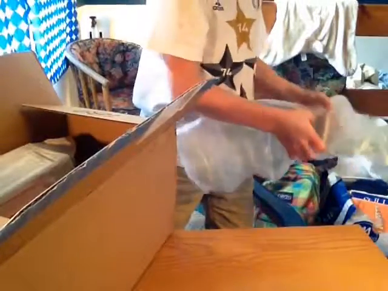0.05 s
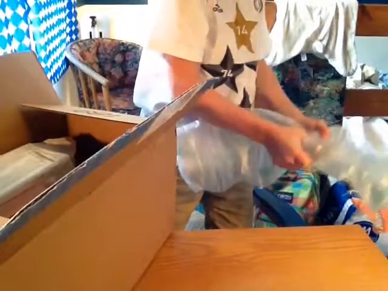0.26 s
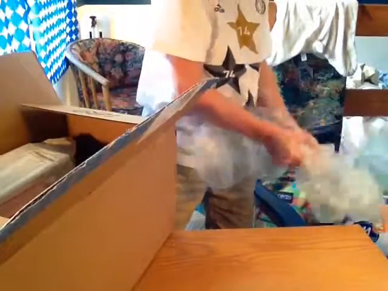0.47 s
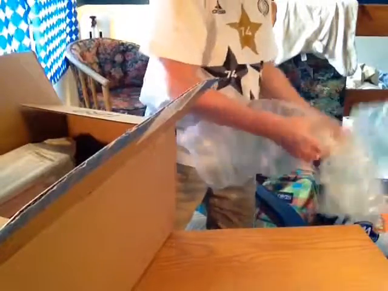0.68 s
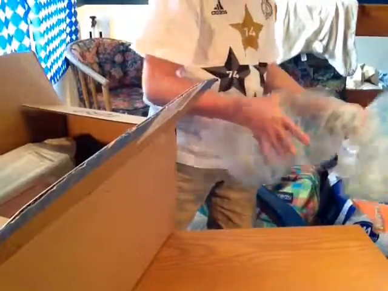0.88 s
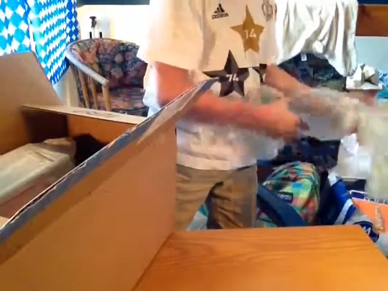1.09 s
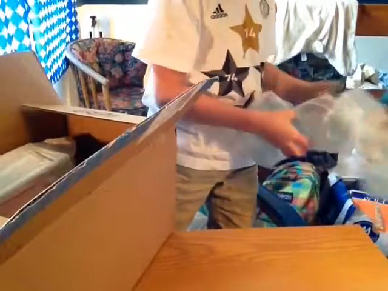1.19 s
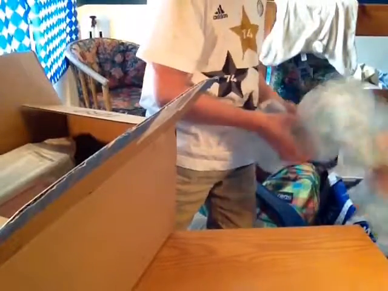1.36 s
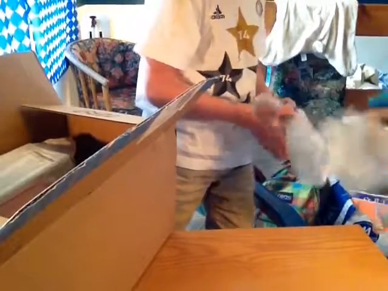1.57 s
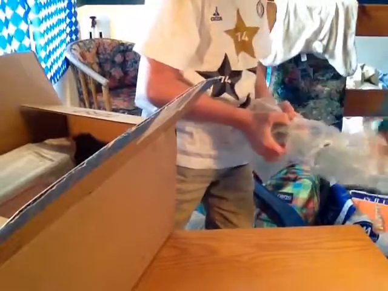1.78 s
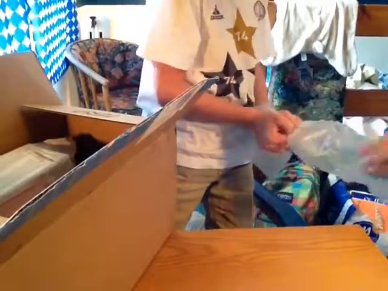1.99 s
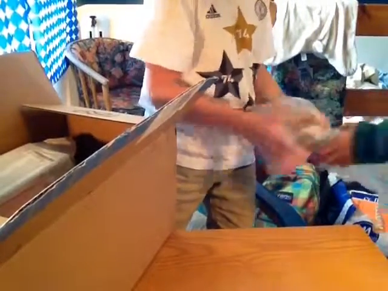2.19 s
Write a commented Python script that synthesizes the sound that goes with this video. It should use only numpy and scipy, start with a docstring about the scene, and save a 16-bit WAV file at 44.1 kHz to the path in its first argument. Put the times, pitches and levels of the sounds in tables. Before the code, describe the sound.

Bubble packaging popped by hand, three loud bursts amid crinkling plastic film in a furnished room

```python
"""Film rustles throughout, with creaks scattered through it and crowded around 1.5 to 1.7 s: hands wring
plastic bubble packaging in a furnished room, a couple of metres from a phone. Three big air pockets burst, each
a thump with a tearing crack, and a small one with only a faint thump; they ring the room. Rustle is filtered
noise with random grains; creaks are short decaying sines with ticks of noise; thumps are filtered impulses,
cracks decaying noise. The microphone overloads on the loud bursts."""
import sys
import numpy as np
from scipy import signal
from scipy.fft import rfft, irfft, next_fast_len
from scipy.io import wavfile
from scipy.ndimage import uniform_filter1d

SR = 44100
rng = np.random.default_rng(int(sys.argv[2]) if len(sys.argv) > 2 else 0)


def int16_out(signal):
    """Quantize to a 16-bit WAV file."""
    q = np.round(np.clip(np.atleast_2d(signal).T, -1, 1) * 32767)
    wavfile.write(sys.argv[1], SR, q.astype(np.int16))


def to_linear_factor(level_db):
    """Convert decibel levels (scalar or array-like) to linear amplitude factors."""
    exponent = np.asarray(level_db, float) / 20
    return 10 ** exponent


N = 99225

M = next_fast_len(N + SR)  # transform length [samples], with space for the room to die away
F = np.maximum(np.arange(M // 2 + 1) * SR / M, 1.)  # frequency of each bin [Hz]


def unit(x):
    """Scale to rms 1."""
    return x / np.sqrt(np.mean(x ** 2))


def shape(table):
    """Gain in dB per frequency bin from (Hz, dB) points, -90 dB outside them."""
    hz, db = np.array(table, float).T
    return np.interp(np.log(F), np.log(hz), db, left=-90, right=-90)


def causal(db):
    """Minimum-phase response with the given gains: nothing sounds ahead of its cause."""
    cepstrum = irfft(np.log(to_linear_factor(db)), M)
    cepstrum[1:M // 2] *= 2
    cepstrum[M // 2 + 1:] = 0
    return np.exp(rfft(cepstrum))


def delay(seconds):
    """Phase turn per frequency bin that makes a sound arrive later."""
    return np.exp(-2j * np.pi * F * seconds)


def highpass(x, order, hz):
    """Butterworth filter that weakens what lies below hz."""
    return signal.sosfilt(signal.butter(order, hz, "high", fs=SR, output="sos"), x)


def room():
    """Transfer of the reflections from one spot: noise that fills in quickly and dies band by band."""
    # late decay of the furnished room: (frequency [Hz], time to fall 60 dB [s])
    decay = [(100, 0.13), (250, 0.4), (550, .4), (1100, 0.57), (1800, 0.38), (4000, 0.33), (10000, 0.34),
             (15000, 0.2)]
    room_db, fill_s = 10.5, 0.00076
    early_db, early_t60_s = 7.5, 0.052  # extra early reflections, on top of the late decay
    mode_hz, mode_db, mode_t60_s = 109, -19, 0.42  # level before the room is scaled
    even_fine_hz, even_broad_hz = 90, 900
    t = np.arange(SR) / SR
    noise = rfft(rng.standard_normal(SR), M)
    hz, t60 = np.array(decay).T
    tail = 0
    for k in range(len(hz)):
        share = np.interp(np.log(F), np.log(hz), np.arange(len(hz)) == k)
        tail = tail + irfft(noise * share, M)[:SR] * to_linear_factor(-60 * t / t60[k])
    early = to_linear_factor(early_db - 60 * t / early_t60_s)
    tail = tail * (1 - np.exp(-t / fill_s)) * (1 + early)
    mode = to_linear_factor(mode_db - 60 * t / mode_t60_s) * np.sin(2 * np.pi * mode_hz * t)
    spec = rfft(tail, M)

    def mean_power(width_hz):
        return uniform_filter1d(np.abs(spec) ** 2, int(width_hz * M / SR))

    # diffuse: no narrow band of the tail stands out
    evening_db = 10 * np.log10(mean_power(even_broad_hz) / mean_power(even_fine_hz))
    spec = spec * causal(evening_db)
    return to_linear_factor(room_db) * (spec + rfft(mode, M)) / np.sqrt(np.sum(tail ** 2))


def heard(spec, wet_db):
    """Direct sound, its echo off the table top and the room."""
    table_echo = to_linear_factor(-4.5) * delay(0.000913)
    return irfft(spec * (1 + table_echo + to_linear_factor(wet_db) * room()), M)[:N]


def rustle():
    """Dense tiny crinkles of uneven size over noise, in three ranges, each flickering a little."""
    # rustle of the film: (time [s], treble level [dB], middle level [dB], bass level [dB])
    levels = [(0.0,-42,-47,-52.5), (0.12,-41,-47,-62), (0.19,-40.5,-44,-55), (0.31,-50.5,-68,-61),
              (0.43,-51,-46,-56), (0.56,-52,-44,-53), (0.641,-48.5,-47.5,-52), (0.75,-38.5,-47,-54),
              (0.86,-43,-50.5,-56.5), (0.931,-37,-45,-54), (.98,-38.5,-45.5,-56), (1.03,-32,-39.5,-43.5),
              (1.1,-36,-42.5,-49), (1.14,-32,-39.5,-44), (1.2,-37.5,-43,-51), (1.27,-32,-40,-46.5),
              (1.33,-38,-42,-46), (1.42,-28,-38,-48), (1.47,-32.5,-30.5,-33.5), (1.52,-26,-28.5,-27),
              (1.6,-29.5,-29.5,-47), (1.66,-31,-35,-43), (1.71,-27,-31.5,-50.5), (1.78,-34,-45,-46),
              (1.85,-28,-35.5,-46), (1.91,-30.5,-40,-46.5), (2.03,-63,-36.5,-59), (2.1,-46.5,-44,-45),
              (2.18,-37.5,-41,-44), (2.25,-42.5,-47.5,-60)]
    # colour of the treble: (frequency [Hz], gain [dB])
    treble = [(2940, -2), (5000, -2), (8140, -2.5), (12400, -1.5), (15500, -7.5)]
    # colour of the middle: (frequency [Hz], gain [dB])
    middle = [(710, 3), (1200, 6), (1780, 2.5), (2090, 7), (5500, -4.5), (7150, -25), (12100, -120)]
    # colour of the bass: (frequency [Hz], gain [dB])
    bass = [(53, -73), (80, -53), (120, 0), (170, -7), (311, 6), (430, -3), (760, 0.5), (1300, -16),
            (1700, -29)]
    grains_per_s, grain_spread_db = 3500, 3.5
    flicker_db, flicker_per_s = 1.5, 30  # depth before smoothing
    wet_db = -18
    t, rows = np.arange(N) / SR, np.array(levels)
    hold = int(SR / flicker_per_s)
    out = 0
    for column, colour in enumerate((treble, middle, bass), start=1):
        is_grain = rng.random(N) < grains_per_s / SR
        size = to_linear_factor(grain_spread_db * rng.exponential(size=N))
        grains = rng.standard_normal(N) * (0.86 + is_grain * size)  # 0.86: the noise beneath
        steps = np.repeat(rng.standard_normal(N // 200), hold)[:N]
        flicker = uniform_filter1d(steps, hold)
        band = unit(irfft(rfft(grains, M) * causal(shape(colour)), M)[:N])
        level_db = np.interp(t, rows[:, 0], rows[:, column])
        out = out + band * to_linear_factor(level_db + flicker_db * flicker)
    return irfft(rfft(out, M) * (1 + to_linear_factor(wet_db) * room()), M)[:N]


def creaks():
    """Each slip ticks, rings briefly at its pitch and shakes the bundle, more so the lower it is."""
    # slips of stretched film: (time [s], level [dB], pitch [Hz])
    slips = [(.105, -30, 1150), (.133, -26, 6500), (.174, -15.5, 5000), (.373, -25, 3800),
             (.997, -26, 6000), (1.4718, -15, 1300), (1.4862, -8, 2000), (1.495, -8, 900),
             (1.515, -6, 1800), (1.5225, -11, 3300), (1.530, -14, 1300), (1.534, -11, 3400),
             (1.538, -16, 3600), (1.5455, -9, 2000), (1.5485, -9, 1200), (1.610, -17, 2500),
             (1.625, -18, 2200), (1.671, -15, 3800), (1.6768, -5, 4000), (1.683, -5, 3900),
             (1.6892, -4.5, 4200), (1.702, -4, 4400), (1.709, -4, 4400), (1.716, -12, 3700),
             (1.720, -13, 3200), (1.729, -17, 4300)]
    creak_t60_s, tick_db, wet_db = .003, -6, -11
    bundle_hz, bundle_t60_s, bundle_db = 333, .016, -7.5  # bundle level for a slip at 1000 Hz
    film_low_hz = 215
    out, t = np.zeros(N + SR), np.arange(SR // 50) / SR
    noise = rng.standard_normal((len(slips), len(t)))

    def ring(hz, t60):
        return np.sin(2 * np.pi * hz * t) * to_linear_factor(-60 * t / t60)

    for (start_s, db, hz), hiss in zip(slips, noise):
        lowness = 1000 / hz
        tick = to_linear_factor(tick_db) * min(lowness, .5) * hiss * np.exp(-t / 0.001)
        slip = highpass(ring(hz, creak_t60_s) + tick, 2, hz / 2.85)
        slip = slip + to_linear_factor(bundle_db) * lowness ** 2 * ring(bundle_hz, bundle_t60_s)
        first = int(start_s * SR)
        out[first:first + len(t)] += to_linear_factor(db) * slip
    thin = highpass(out[:N], 2, film_low_hz)
    return heard(rfft(thin, M), wet_db)


def pops():
    """Escaping air thumps at the pitch of the pocket; the film tears with a crack, lost in the small one."""
    # moments at which the pockets burst: (time [s])
    burst_s = [0.2022, 0.326, 0.4494, 1.9243]
    # the bursts: (thump level [dB], pocket pitch [Hz], tilt [dB per octave], thump after crack [s],
    # crack level [dB], crack decay constant [s])
    bursts = [(1, 900, 0, 0.00018, -11, .002), (-21.5, 990, 1, 0.000084, -53, .002),
              (-4.5, 356, -1.5, 0.002586, -2.5, 0.0021), (2, 850, 1.5, 0.00025, -6.5, 0.0029)]
    # colour of the escaping air: (frequency [Hz], gain [dB])
    thump_colour = [(35, -61), (60, -63.5), (118, -12), (500, 1.5), (763, -4), (825, -4.5), (1040, -7),
                    (1820, -17), (6000, -32.5), (7800, -143), (13200, -120)]
    # colour of the tearing film: (frequency [Hz], gain [dB])
    crack_colour = [(60, -62), (500, -16.5), (2000, -1), (5000, -1.5), (9000, -5), (15500, -3.5),
                    (21000, -17)]
    pocket_q, pocket_db = 2.43, 3  # sharpness and height of the pocket's resonance
    crack_wet_db = -6
    out, t = 0, np.arange(SR // 20) / SR
    for start_s, (db, hz, tilt_db, lag_s, crack_db, length_s) in zip(burst_s, bursts):
        octaves = np.log2(F / hz)
        resonance = pocket_db * np.exp(-(pocket_q * octaves) ** 2)
        thump = causal(shape(thump_colour) + resonance + tilt_db * octaves)
        thump = to_linear_factor(db) * thump / np.abs(irfft(thump, M)).max()  # level is that of the direct peak
        thump = thump * delay(start_s + abs(lag_s))
        tear = rng.standard_normal(len(t)) * np.exp(-t / length_s)
        crack = to_linear_factor(crack_db) * causal(shape(crack_colour)) * delay(start_s)
        # the room answers a single impulse with the energy of the tear
        echoes = to_linear_factor(crack_wet_db) * np.sqrt(np.sum(tear ** 2)) * room()
        out = out + heard(thump, 0) + irfft(crack * (rfft(tear, M) + echoes), M)[:N]
    return out


def scene():
    """All sources at the microphone."""
    return (rustle() + creaks() + pops())[None]


def roll_off(x):
    """The treble ends steeply here."""
    return signal.sosfilt(signal.butter(12, 16440, fs=SR, output="sos"), x)


def record(dry):
    """The microphone rounds off the bursts and loses deep bass and the top."""
    bass_cut_hz, top_hz = 123, 15350
    knee = 4  # higher: harder limit at full scale
    x = highpass(dry, 2, bass_cut_hz)
    x = x / (1 + np.abs(x) ** knee) ** (1 / knee)
    x = highpass(x, 1, 70)
    x = signal.sosfilt(signal.ellip(8, .2, 40, top_hz, fs=SR, output="sos"), x)
    mix = np.clip(x, -1, 1)
    return roll_off(mix)


dry = scene()
out = record(dry)
int16_out(out)
```